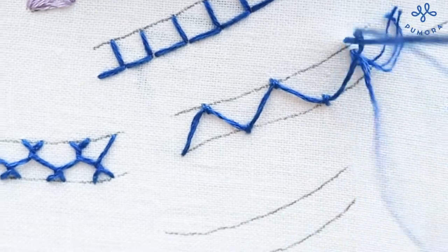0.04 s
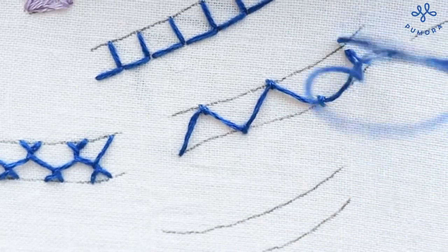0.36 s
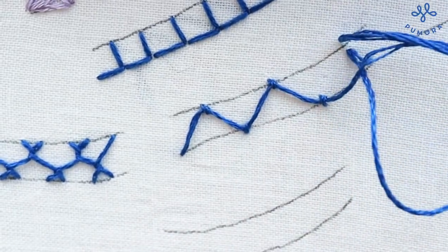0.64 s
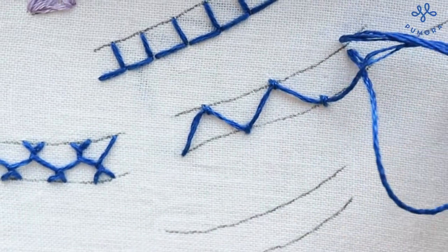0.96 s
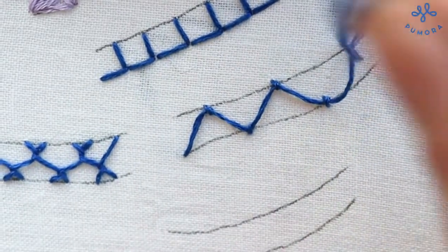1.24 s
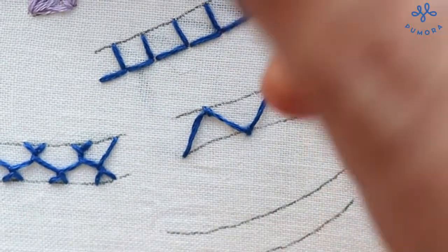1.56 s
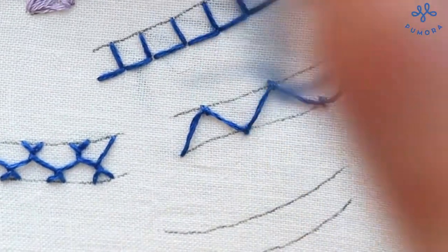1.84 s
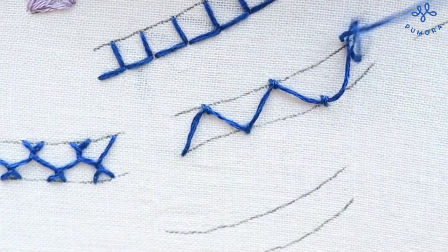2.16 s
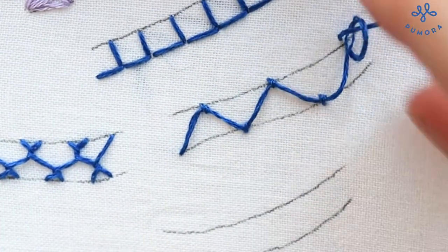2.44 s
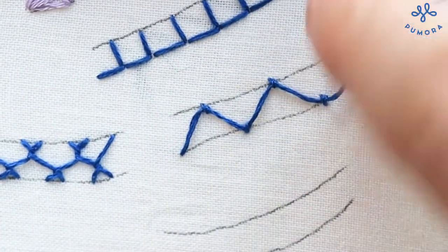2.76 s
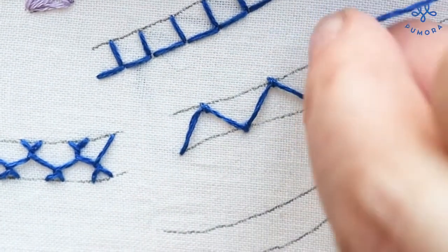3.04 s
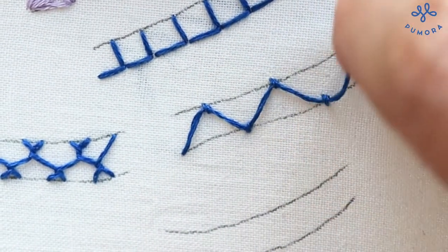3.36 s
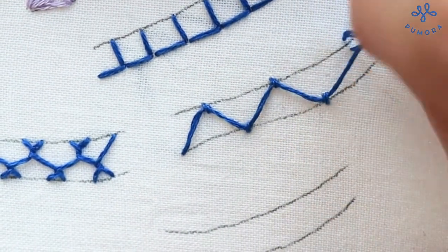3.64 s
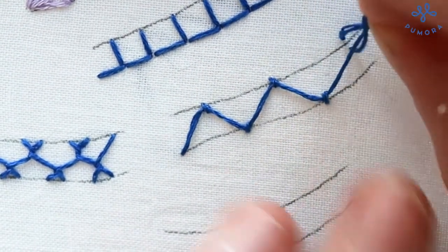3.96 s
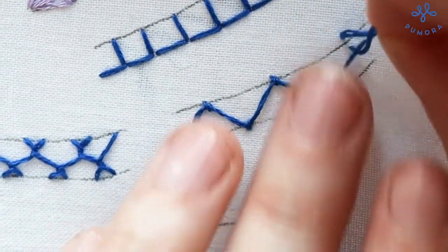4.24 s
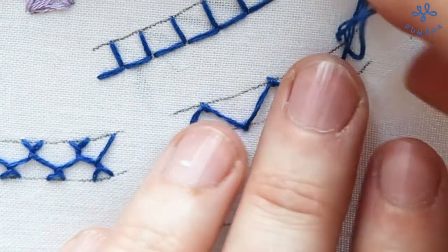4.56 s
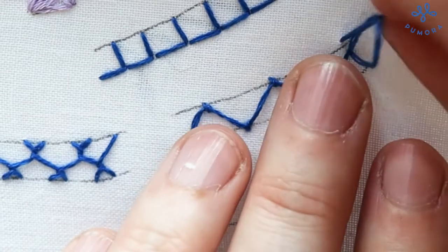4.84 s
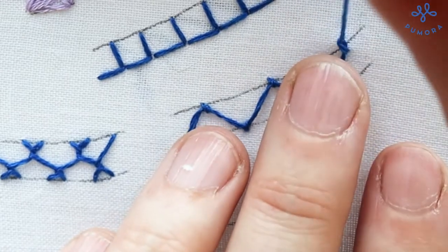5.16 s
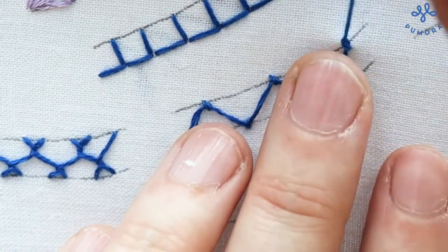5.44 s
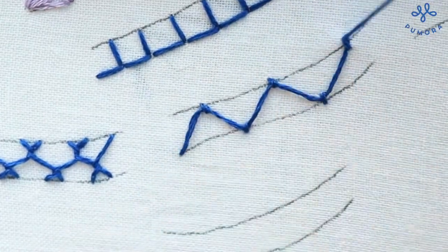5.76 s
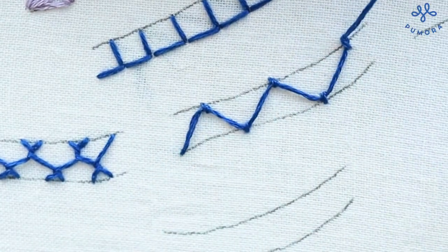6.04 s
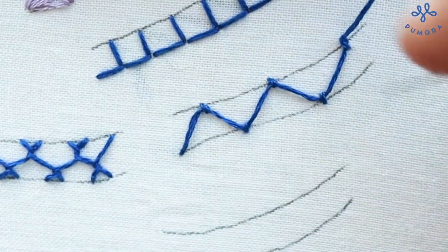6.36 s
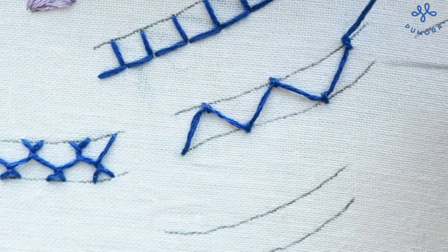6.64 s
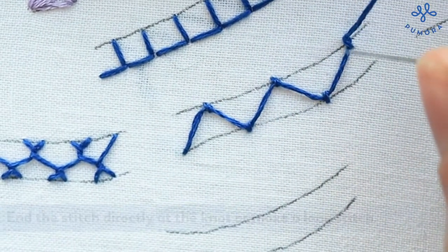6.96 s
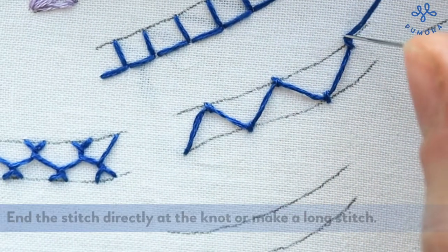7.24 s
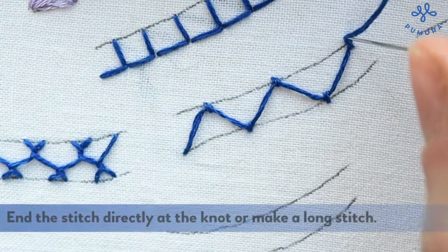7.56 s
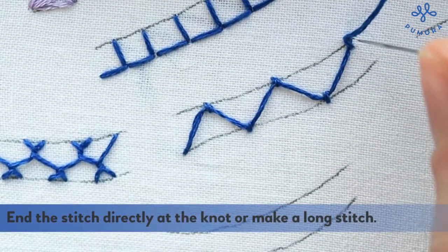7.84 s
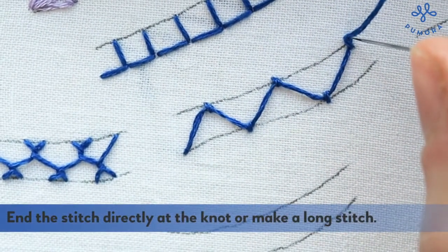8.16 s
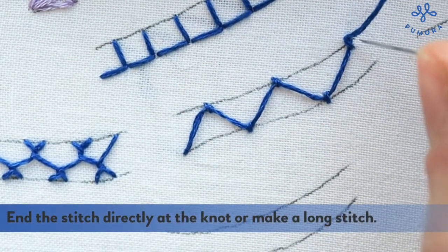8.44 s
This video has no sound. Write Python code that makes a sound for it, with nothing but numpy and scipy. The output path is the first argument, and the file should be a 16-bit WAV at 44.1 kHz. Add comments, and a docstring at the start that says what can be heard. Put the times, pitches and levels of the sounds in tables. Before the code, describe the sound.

Hand embroidery in a quiet room: needle and thread pluck taut cloth with soft thumps, and thread rasps through the weave.

```python
"""Hand embroidery, close up in a quiet room; cotton cloth is stretched in a hoop like a small drum.
First needle and thread pluck the cloth and rasp through its weave until the tight thread mutes it.
Near 1 s slack thread zips through the fingers; more plucks follow, and the hoop is nudged and sways.
From 2.5 s fingers rub the cotton, with another stitch at 3.5 s and higher-ringing pulls to 5.2 s.
Near 6 s the needle scrapes and loose thread slides; last, the hand shifts against the hoop."""
import sys
import numpy as np
from scipy import signal
from scipy.fft import rfft, irfft, next_fast_len
from scipy.io import wavfile

SR = 44100
rng = np.random.default_rng(int(sys.argv[2]) if len(sys.argv) > 2 else 0)


def dump(signal):
    """Clip the signal to [-1, 1] and save it as 16-bit WAV at the path in sys.argv[1]."""
    limited = np.clip(np.atleast_2d(signal).T, -1, 1)
    pcm = np.round(limited * 32767).astype(np.int16)
    wavfile.write(sys.argv[1], SR, pcm)


N = 384111
TIME = np.arange(N) / SR
RING_TIME = TIME[:SR // 3]
CUTOFF_HZ = 15650

# modes of the taut cloth: pitch_hz, level_db, t60_s
CLOTH_MODES = [(102.5, 0, 0.12), (133.5, -6.5, 0.075), (152, -11.5, 0.083), (195, -5, 0.048),
               (236, -10.5, 0.069), (327.5, -16.5, 0.13), (400.4, -22.5, 0.21), (484.5, -24, 0.13),
               (572, -24, 0.13), (741, -15.5, 0.063), (998, -26, 0.047), (1311, -29.5, 0.13),
               (1915, -34, 0.13)]
# spectrum of thread rasping in the weave: freq_hz, gain_db
RASP_SPECTRUM = [(150, 22), (400, 17.5), (750, 12), (1130, 8), (1400, 9.5), (2300, -2.5), (3000, 2),
                 (3800, -1), (5000, -6), (7300, -7.5), (8500, 0.5), (10300, -14), (13000, -7), (15800, -16)]


def from_db(db):
    """Decibels to gain."""
    return 10 ** (np.asarray(db) / 20)


def rms_one(x):
    """Scale to unit rms."""
    return x / np.sqrt(np.mean(x ** 2) + 1e-20)


def drift(rate_hz):
    """Random wander, unit rms."""
    return rms_one(np.interp(TIME * rate_hz, np.arange(20000), rng.standard_normal(20000)))


def add(track, start_s, sound):
    """Mix a short sound into the track."""
    start = max(round(start_s * SR), 0)
    track[start:start + len(sound)] += sound[:N - start]


def coloured(x, spectrum, treble=True):
    """Minimum-phase filter; unit mean power gain in the treble, or else below the cutoff."""
    size = 2 * next_fast_len(N // 2 + SR // 4)
    hz = np.maximum(np.arange(size // 2 + 1) * SR / size, 1)
    freq_hz, gain_db = np.array(spectrum).T
    gain = from_db(np.interp(np.log(hz), np.log(freq_hz), gain_db))
    band = (hz > 1500) & (hz < 14000) if treble else hz < CUTOFF_HZ
    gain = gain / np.sqrt(np.mean(gain ** 2 * band))
    cepstrum = irfft(np.log(gain))[:size // 2]
    cepstrum[1:] *= 2
    return irfft(rfft(x, size) * np.exp(rfft(cepstrum, size)))[:N]


def resonance(x, hz, width_hz):
    """Two-pole resonance that keeps the power of white noise."""
    radius = np.exp(-np.pi * width_hz / SR)
    feedforward = np.sqrt((1 - radius ** 2) / 2) * np.array([1, 0, -1])
    feedback = [1, -2 * radius * np.cos(2 * np.pi * hz / SR), radius ** 2]
    return signal.lfilter(feedforward, feedback, x)


def resonances(x, peaks):
    """Resonances in parallel."""
    return sum(from_db(db) * resonance(x, hz, width_hz) for hz, width_hz, db in peaks)


def stroke(crest_s, rise_s, fall_s, level_db, edge_db=16, roundness=1.58):
    """Gain of one hand movement: swells to its fastest moment, then eases off."""
    gain = np.full(N, 1e-9)
    near = (TIME > crest_s - 2 * rise_s) & (TIME < crest_s + 2 * fall_s)
    offset_s = TIME[near] - crest_s
    distance = np.abs(offset_s / np.where(offset_s < 0, rise_s, fall_s))
    gain[near] = from_db(level_db - edge_db * distance ** roundness)
    return gain


def strokes(rows):
    """Gain of several movements; overlaps add in power."""
    return np.sqrt(sum(stroke(*row) ** 2 for row in rows))


def room(tone_db=-61.5, hum_hz=116, hum_db=-73):
    """Steady room tone with a faint wavering hum."""
    # room tone: freq_hz, gain_db
    spectrum = [(20, -3.5), (60, -1), (130, -1), (260, -5.5), (410, -6.5), (560, -10), (1000, -12.5),
                (2000, -16), (4000, -18.5), (8000, -20), (15500, -23)]
    hum_gain = from_db(hum_db + 3.3 * drift(3.9))
    hum = hum_gain * np.sqrt(2) * np.sin(2 * np.pi * hum_hz * TIME + .5 * drift(3.3))
    return hum + from_db(tone_db) * coloured(rng.standard_normal(N), spectrum, treble=False)


def friction(slips_per_s, spread_db, clump_db, clump_hz):
    """Fibres catch and slip: tiny uneven clicks that bunch into clumps."""
    slips = (rng.random(N) < slips_per_s / SR) * rng.choice([-1, 1], N)
    size_db = spread_db * np.minimum(rng.exponential(1, N), 4)
    return rms_one(slips * from_db(size_db + clump_db * drift(clump_hz)))


def ringing(modes, scatter_db=0):
    """The cloth's response to one tug; each spot favours the overtones differently."""
    hz, db, t60_s = np.array(modes).T[:, :, None]
    order = np.arange(len(modes))[:, None]
    db = db + scatter_db * rng.standard_normal(db.shape) * (order > 0)
    envelopes = from_db(db - 60 * RING_TIME / t60_s)
    return np.sum((-1) ** order * envelopes * np.sin(2 * np.pi * hz * RING_TIME), axis=0)


def drawn_thread(rows, slips, modes, rasp_spectrum):
    """The same slips drum the cloth and are heard directly as a rasp."""
    response = ringing(modes)
    drum_gain = strokes((*timing, drum_db) for *timing, drum_db, _ in rows)
    rasp_gain = strokes((*timing, rasp_db) for *timing, _, rasp_db in rows)
    drumming = signal.fftconvolve(slips * drum_gain, response / np.linalg.norm(response))[:N]
    return drumming + coloured(slips * rasp_gain, rasp_spectrum)


def pulls():
    """Thread pulls that ring the cloth low or higher."""
    # pulls: crest_s, rise_s, fall_s, drum_db, rasp_db
    low_pulls = [(0.045, 0.035, 0.095, -37.5, -62.5), (0.27, 0.08, 0.12, -38, -61.5),
                 (0.385, 0.06, .02, -35, -58.5), (1.242, 0.014, 0.06, -24.5, -49.5),
                 (1.41, 0.24, 0.072, -39, -64.5), (1.51, 0.15, 0.14, -32.5, -57.5),
                 (1.675, 0.071, 0.086, -32.5, -57.5), (3.542, 0.029, 0.017, -34, -61),
                 (3.595, .025, .02, -41, -61)]
    higher_ringing_pulls = [(3.685, .03, 0.024, -46.5, -61), (3.795, 0.082, 0.024, -47, -65.5),
                            (4.95, 0.019, 0.035, -48.5, -59), (4.995, 0.057, 0.069, -43.5, -53),
                            (5.11, 0.066, 0.088, -43.5, -53), (5.205, 0.1, 0.036, -46, -59)]
    # the cloth's higher ring: pitch_hz, level_db, t60_s
    higher_modes = [(146, 0, 0.16), (222, -1.5, 0.091), (298, -4, 0.066), (371, -8, 0.067),
                    (497.6, -8.5, 0.19), (605, -5.5, 0.055), (752, 0, 0.059), (953, -3.5, 0.04),
                    (1500, -13, 0.024)]
    # its rasp: freq_hz, gain_db
    higher_rasp = [(300, -1), (1000, 7), (1800, 5), (2400, 4), (3100, 3.5), (4500, -2), (5300, -9),
                   (8400, -8), (10300, -17), (13000, -9), (15800, -29)]
    low_slips = friction(slips_per_s=5000, spread_db=2, clump_db=3.0, clump_hz=180)
    higher_slips = friction(slips_per_s=5000, spread_db=2.5, clump_db=2.0, clump_hz=230)
    low = drawn_thread(low_pulls, low_slips, CLOTH_MODES, RASP_SPECTRUM)
    return low + drawn_thread(higher_ringing_pulls, higher_slips, higher_modes, higher_rasp)


def burst(decay_s, rise_s=0.00083):
    """A brief spray of tiny snaps."""
    noise = rng.standard_normal(len(RING_TIME))
    return noise * np.exp(-RING_TIME / decay_s) * (1 - np.exp(-RING_TIME / rise_s))


def plucks(thump_trim_db=-1, snap_trim_db=1, t60_s=0.1, release_hz=260):
    """A released catch rings the cloth under a spray of fibre snaps; pitch follows tension."""
    # needle and thread catch in the weave and let go: start_s, thump_db, snap_db, pitch_hz
    catches = [(0.030, -26, -48.5, 111), (0.057, -47, -47, 92), (0.077, -44, -53, 80),
               (0.107, -37, -50.5, 70.4), (0.169, -17.5, -53, 90), (0.191, -19, -72, 82),
               (0.218, -22, -72, 83), (0.245, -24, -48, 111), (0.259, -22, -46, 91),
               (0.271, -29, -44.5, 114), (0.282, -21.5, -57, 95), (0.301, -28, -48, 126),
               (0.312, -23, -54, 102), (0.352, -20.5, -47, 105), (0.378, -19.5, -44.5, 105),
               (0.392, -17.5, -45, 107), (0.935, -37.5, -62, 94), (1.23, -8.5, -37, 104.6),
               (1.622, -29, -53, 123), (1.65, -21, -62, 111.4), (3.475, -37, -72, 98),
               (3.544, -15.5, -43.5, 94.5), (3.597, -28, -54, 98), (3.664, -29, -52.5, 88),
               (3.678, -32, -51.5, 103)]
    thumps, overtones, snaps = np.zeros((3, N))
    for start_s, thump_db, snap_db, pitch_hz in catches:
        overtone_db = -6 + 0.58 * thump_db + 0.14 * snap_db  # grows with the tug's size and sharpness
        add(thumps, start_s, -from_db(thump_db + thump_trim_db) * ringing([(pitch_hz, 0, t60_s)]))
        add(overtones, start_s, from_db(overtone_db) * ringing(CLOTH_MODES[1:], scatter_db=4.5))
        add(snaps, start_s, from_db(snap_db + snap_trim_db) * burst(decay_s=0.003))
    # soft thread lets go gradually, rounding the attack
    softened = signal.sosfilt(signal.butter(1, release_hz, fs=SR, output="sos"), thumps + overtones)
    return softened + coloured(snaps, RASP_SPECTRUM)


def slides(trim_db=-3.5):
    """Loose thread slides over the weave with a fine, even hiss."""
    # slides: crest_s, rise_s, fall_s, level_db
    moves = [(0.16, 0.1, 0.069, -54.5), (0.548, .06, .06, -59), (4.03, .12, 0.34, -56),
             (4.36, 0.091, 0.13, -57), (5.74, .06, 0.13, -64), (6.02, 0.18, 0.43, -55.5),
             (6.3, .045, 0.021, -58.5)]
    # their hiss: freq_hz, gain_db
    spectrum = [(300, 4), (1000, -0.5), (2600, -2.5), (4200, 1), (5500, 2), (6800, -0.5), (8600, 3),
                (10500, -6.5), (13200, -1.5), (15800, -11)]
    slips = friction(slips_per_s=14000, spread_db=2.0, clump_db=2.16, clump_hz=53)
    return from_db(trim_db) * coloured(slips * strokes(moves), spectrum)


def ticks():
    """Small catches of the thread, one brief ring each."""
    # ticks and twangs: start_s, level_db, ring_hz, width_hz, decay_s
    catches = [(0.163, -44, 1360, 160, 0.005), (.168, -43.5, 492, 45, 0.012),
               (.487, -47, 2400, 596, 0.0021), (0.643, -57, 12000, 5000, 0.0087),
               (.794, -59.5, 9000, 1500, .013), (2.282, -48.5, 7120, 895, 0.0024),
               (2.547, -64, 2620, 250, 0.037), (3.543, -39.5, 2070, 1490, 0.0033),
               (3.68, -44, 2180, 1390, 0.0014), (6.165, -54, 1780, 700, 0.0077)]
    out = np.zeros(N)
    for start_s, level_db, ring_hz, width_hz, decay_s in catches:
        add(out, start_s, from_db(level_db) * resonance(burst(decay_s), ring_hz, width_hz))
    return out


def smothered(cloth, tight_s=0.399, slack_s=0.85, fade_db_per_s=450):
    """Tight thread mutes the cloth until it slackens."""
    held_s = np.where((TIME > tight_s) & (TIME < slack_s), TIME - tight_s, 0)
    return cloth * from_db(-fade_db_per_s * held_s)


def whisk(crest_hz=408, sag_hz_per_s=600, jitter=0.13, throb=0.26):
    """Thread hisses through the hand; the ridges of its twist buzz at a falling, unsteady pitch."""
    # whisks, and the buzz at their fastest: crest_s, rise_s, fall_s, level_db
    moves = [(0.985, 0.052, 0.051, -59.5), (1.063, 0.046, 0.059, -50.5), (1.138, 0.07, 0.031, -58)]
    buzz_moves = [(1.08, 0.051, 0.047, -42.5)]
    # hiss of fast thread: freq_hz, gain_db
    spectrum = [(200, 17.5), (450, 18), (750, 17), (1100, 7), (2200, 6.5), (4000, 4.5), (7200, 1.5),
                (8000, 6.5), (9500, 7), (10400, -8), (13000, -2), (15800, -13)]
    crest_s = buzz_moves[0][0]
    ridges_hz = np.clip(crest_hz - sag_hz_per_s * (TIME - crest_s), crest_hz / 2, 2 * crest_hz)
    phase = 2 * np.pi * np.cumsum(ridges_hz * (1 + jitter * drift(520))) / SR
    buzz = np.sqrt(2) * np.sin(phase) * strokes(buzz_moves) * from_db(1.3 * drift(210))
    slips = friction(slips_per_s=8100, spread_db=2.5, clump_db=3.0, clump_hz=56)
    return buzz + coloured(slips * strokes(moves) * (1 + throb * np.cos(phase)), spectrum)


def touches(rise_s=0.0044, push_db=7, cloth_db=-1):
    """A fingertip gives a dull, damped push and barely wakes the cloth."""
    # touches on cloth and hoop: start_s, level_db, pitch_hz, t60_s
    contacts = [(1.151, -28, 37.7, 0.048), (1.399, -25, 32.5, 0.096), (1.922, -22.5, 43.8, 0.18),
                (2.528, -38.5, 93.6, 0.12), (2.909, -40, 75.4, 0.11), (3.291, -45.5, 99.6, 0.038),
                (3.864, -32, 35.0, 0.066), (4.568, -49.5, 197, 0.082), (5.494, -36.5, 97, 0.04),
                (5.784, -43, 57.6, 0.11), (5.874, -38, 140, 0.034), (6.307, -35, 39.7, 0.17),
                (6.357, -38.5, 78.6, 0.15), (6.78, -37, 164, 0.039), (6.812, -40.5, 70.6, 0.078),
                (8.281, -56, 75, 0.16)]
    attack = (1 - np.exp(-RING_TIME / rise_s)) ** 2
    out = np.zeros(N)
    for start_s, level_db, pitch_hz, t60_s in contacts:
        push = from_db(push_db - 60 * RING_TIME / t60_s) * np.sin(2 * np.pi * pitch_hz * RING_TIME)
        coupling = from_db(cloth_db) * min(pitch_hz / CLOTH_MODES[0][0], 1) ** 2
        ring = coupling * ringing(CLOTH_MODES, scatter_db=2.5)
        add(out, start_s, from_db(level_db) * (push + ring) * attack)
    return out


def hoop_sway(trim_db=-2):
    """The hoop rumbles as it sways in the hand."""
    # sways: crest_s, rise_s, fall_s, level_db
    moves = [(1.178, 0.025, 0.056, -33), (1.405, 0.091, .09, -36), (1.75, 0.13, 0.34, -28),
             (1.96, 0.086, .12, -23), (2.09, 0.062, 0.065, -30.5), (2.26, .12, 0.19, -53),
             (3.57, 0.095, 0.23, -52), (3.88, 0.044, 0.063, -37.5), (4.02, 0.11, 0.21, -47.5),
             (4.37, 0.075, 0.11, -49.5), (5.54, 0.035, 0.11, -49), (5.93, 0.16, 0.17, -46.5),
             (6.4, 0.13, 0.098, -38.5), (6.55, 0.088, 0.19, -47), (6.84, .05, 0.12, -48.5)]
    # rumble: freq_hz, gain_db
    spectrum = [(12, -14), (22, 4.5), (33, -0.5), (55, -11.5), (90, -18.5), (160, -54.5), (400, -73),
                (2000, -69.5)]
    return from_db(trim_db) * coloured(rng.standard_normal(N), spectrum, treble=False) * strokes(moves)


def rubs(trim_db=-3, pinch_width_hz=230):
    """Skin on cotton: a grainy hiss, each pinch with its own resonance."""
    # finger rubs: crest_s, rise_s, fall_s, level_db, pinch_hz, pinch_db
    moves = [(2.57, 0.046, 0.037, -59.5, 2500, -1.5), (2.68, 0.091, 0.41, -65.5, 2400, -12),
             (2.95, 0.063, 0.065, -65, 2400, -12), (3.18, 0.12, 0.076, -62.5, 2400, -9),
             (3.41, 0.094, .06, -62.5, 2400, -17), (4.635, 0.05, .17, -61, 2340, -4.5),
             (4.766, 0.059, 0.051, -59.5, 2550, 0), (4.86, 0.033, 0.048, -59, 2600, -5),
             (6.43, 0.017, .08, -62, 3620, 0.5), (6.51, 0.062, 0.13, -61, 3600, -4),
             (6.615, 0.044, .11, -63, 3470, -16), (6.85, 0.043, 0.061, -61.5, 3480, -7)]
    # their hiss: freq_hz, gain_db
    spectrum = [(300, 15), (780, 5), (1500, 3.5), (3000, 2.5), (4200, 2.5), (5600, 1.5), (6700, -0.5),
                (8300, 2), (10300, -12), (13500, -5), (15800, -5)]
    # resonances common to all rubs: freq_hz, width_hz, gain_db
    peaks = [(700, 100, -11), (8300, 730, -10.5)]
    slips = friction(slips_per_s=9000, spread_db=1.0, clump_db=1.5, clump_hz=110)
    rubbing, pinched = np.zeros((2, N))
    for *move, pinch_hz, pinch_db in moves:
        rub = slips * stroke(*move)
        rubbing += rub
        pinched += from_db(pinch_db) * resonance(rub, pinch_hz, pinch_width_hz)
    return from_db(trim_db) * (coloured(rubbing, spectrum) + resonances(rubbing, peaks) + pinched)


def needle_scrapes():
    """The needle scrapes as the stitch draws tight."""
    # scrapes: start_s, level_db, decay_s
    scrapes = [(5.957, -43.5, 0.006), (5.983, -46.5, 0.0038)]
    # joint resonances of needle and cloth: freq_hz, width_hz, gain_db
    peaks = [(330, 34, 3.5), (600, 68, -11), (1320, 79, -13), (3220, 230, -10), (3640, 130, -2.5),
             (6160, 69, -0.5), (8350, 250, -8)]
    out = np.zeros(N)
    for start_s, level_db, decay_s in scrapes:
        add(out, start_s, from_db(level_db) * resonances(burst(decay_s), peaks))
    return out


def hand_shift(broadband_db=-6):
    """The hand brushes the hoop; the pressed cloth colours the sound."""
    # shift: crest_s, rise_s, fall_s, level_db
    moves = [(8.24, 0.39, 0.29, -59)]
    # brushing: freq_hz, gain_db
    spectrum = [(120, -13), (350, 10), (480, -6), (650, -2), (1000, 6), (1400, -25), (4000, -49)]
    # resonances of the pressed cloth: freq_hz, width_hz, gain_db
    peaks = [(352, 38, -9.5), (392, 14, -15), (527, 26, -12.5), (626, 20, -10.5), (806, 37, -19),
             (976, 43, -32)]
    brush = rng.standard_normal(N) * strokes(moves)
    return from_db(broadband_db) * coloured(brush, spectrum, treble=False) + resonances(brush, peaks)


def reflected(x, highpass_hz=500):
    """Small nearby surfaces throw back only the shorter waves."""
    # reflections from table, hands and walls: delay_s, gain_db
    echoes = [(.0023, -24), (.0061, -18), (.0113, -19.5), (.0187, -21.5), (.027, -23)]
    upper = signal.sosfilt(signal.butter(1, highpass_hz, "high", fs=SR, output="sos"), x)
    return x + sum(from_db(db) * np.interp(TIME - delay_s, TIME, upper, left=0) for delay_s, db in echoes)


def scene():
    """All sources centred; only a faint hiss differs between the channels."""
    cloth = smothered(pulls() + plucks())
    sewing = cloth + touches() + ticks() + needle_scrapes() + whisk() + slides() + rubs()
    hiss = signal.lfilter([1, -.5], [1], rng.standard_normal((2, N)))
    return reflected(sewing) + hoop_sway() + hand_shift() + room() + from_db(-72) * hiss


def record(dry):
    """Steep low-pass."""
    return signal.sosfilt(signal.ellip(12, .1, 90, CUTOFF_HZ, fs=SR, output="sos"), dry)


dry = scene()
out = record(dry)
dump(out)
```